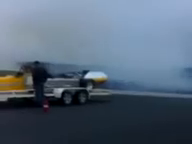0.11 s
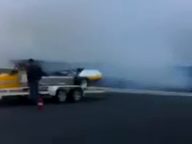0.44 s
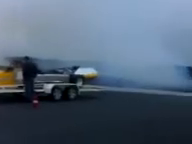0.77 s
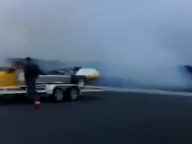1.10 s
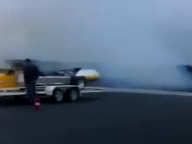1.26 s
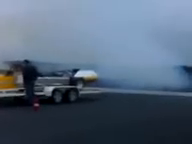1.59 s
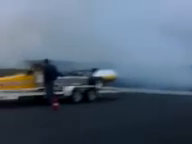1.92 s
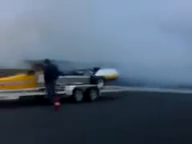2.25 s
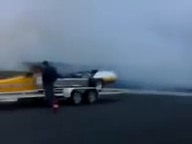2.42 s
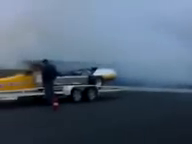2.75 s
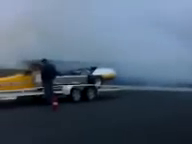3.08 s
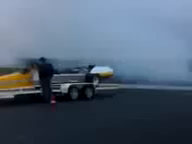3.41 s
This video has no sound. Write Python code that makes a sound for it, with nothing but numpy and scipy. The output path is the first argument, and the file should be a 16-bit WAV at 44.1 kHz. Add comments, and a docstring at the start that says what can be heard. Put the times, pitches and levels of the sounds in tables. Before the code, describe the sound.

A loud jet engine roars without a break in the open air, with a wavering howl, fluttering turbine tones and a faint low drone underneath. The microphone sounds muffled and overloads slightly, adding a light crackle.

```python
"""On an open airfield, a jet engine on a trailer runs at steady high power.
Turbulence in the exhaust makes a wide roar and rings in resonances as a hollow howl. A brighter rush
drifts in pitch, the turbine whines in a few thin tones, and a low drone sits underneath.
The small microphone passes little above 4 kHz and overloads on the highest crests, which crackle."""
import sys
import numpy as np
from scipy import signal
from scipy.fft import rfft, irfft
from scipy.io import wavfile
from scipy.ndimage import uniform_filter1d

SR = 44100
rng = np.random.default_rng(int(sys.argv[2]) if len(sys.argv) > 2 else 0)


def pcm_store(signal):
    """Save signal as 16-bit PCM."""
    levels = np.round(np.clip(np.atleast_2d(signal), -1, 1) * 32767)
    wavfile.write(sys.argv[1], SR, levels.astype(np.int16).T)


N = 155673
TIME = np.arange(N) / SR
FLUTTER_HZ = 13.4  # pace of the tones' flutter and the exhaust's buffeting

# Surges of the exhaust. Each row: time in seconds, howl gain in dB, gain of the roar's treble in dB.
EXHAUST_SURGES = [(0, 0, 2), (.2, -3.5, 3), (.35, 2.5, 0.5), (.7, -2, 0), (1.0, -0.5, -1), (1.5, 0.5, -0.5),
                  (1.85, -1.5, 0.5), (2.35, -0.5, 0.5), (2.5, -2.5, 2), (2.7, 2, 2), (3.0, 0, -1.5),
                  (3.25, 1.5, -0.5), (3.53, -1, -0.5)]


def roar(level_db=-16, patch_db=1.68, treble_ramp_hz=(1800, 2700)):
    """The exhaust mixes with the air: wide noise whose colour shifts in turbulent patches."""
    # Tone colour of the roar. Each row: frequency in Hz, relative level in dB.
    roar_spectrum = [(10, -49.5), (28, -29.5), (55, -23), (100, -8.5), (155, -9.5), (200, -9), (250, 3),
                     (300, 0), (385, -3.5), (440, 1), (520, -6), (610, 2), (880, 0), (980, 2.5), (1250, -6),
                     (1550, -4), (2300, -6.5), (2750, -5.5), (3100, -14), (3500, -22), (3900, -29),
                     (4250, -40), (4600, -55)]
    size, hop = 1024, 256
    frames = N // hop + 5
    hz = np.fft.rfftfreq(size, 1 / SR)
    frame_times = np.arange(frames) * hop / SR
    real, imag, patches = rng.standard_normal((3, frames, len(hz)))
    patches = uniform_filter1d(patches, size=14, axis=0)  # smear in time
    patches = unit(uniform_filter1d(patches, size=8, axis=1))  # and in frequency
    points_hz, points_db = np.transpose(roar_spectrum)
    colour_db = np.interp(np.log(hz + 1), np.log(points_hz), points_db)
    _, surge_db = curve(EXHAUST_SURGES, frame_times)
    treble_db = np.outer(surge_db, np.interp(hz, treble_ramp_hz, [0, 1]))
    spectra = (real + 1j * imag) * amp(colour_db + treble_db + patch_db * patches)
    _, noise = signal.istft(spectra.T, nperseg=size, noverlap=size - hop)
    return amp(level_db) * unit(noise[:N])


def howl():
    """The exhaust drives a cluster of close, hollow resonances that waver together."""
    # Resonances of the howl. Each row: centre in Hz, width in Hz, level in dB before surge and swell.
    howl_bands = [(671, 20.6, -25.5), (729.2, 68, -21.5), (786, 94, -21.5), (833.6, 54, -26.5)]
    surge_db, _ = curve(EXHAUST_SURGES, TIME)
    waver = .25 * drift(rate_hz=9)  # as a share of each width
    cluster = sum(amp(db) * resonance(hz + width * waver, width) for hz, width, db in howl_bands)
    return amp(surge_db) * cluster


def rush():
    """The bright rush of the jet: two bands of noise, each drifting in pitch and level."""
    # Path of the main band. Each row: time in seconds, centre in Hz, level in dB before the swell.
    main_band = [(0, 1833, -13.5), (.25, 1765, -14.5), (.55, 1803, -17.5), (.72, 1772, -15.5),
                 (.85, 2055, -20.5), (1.05, 1956, -21.5), (1.4, 1949, -18), (2.1, 1899, -19.5),
                 (2.6, 1863, -15.5), (3.1, 1876, -18.5), (3.53, 1860, -17.5)]
    # Path of a thinner, higher band, with the same columns.
    high_band = [(0, 2560, -30), (.25, 2500, -26), (.45, 2550, -34), (.68, 2480, -27), (.82, 2270, -24.5),
                 (1.05, 2230, -25), (1.6, 2260, -33), (2.1, 2250, -24), (2.5, 2280, -37.5),
                 (3.53, 2500, -37.5)]
    out = np.zeros(N)
    for path, width_hz in ((main_band, 330), (high_band, 215)):
        centre_hz, level_db = curve(path, TIME)
        out += amp(level_db) * resonance(centre_hz, width_hz)
    return out


def whine(wander_depth_hz=1.44, flutter_depth=.54):
    """The turbine's thin tones wander slightly in pitch and flutter in the hot air."""
    # Turbine tones. Each row: frequency in Hz, level in dB.
    turbine_tones = [(1395, -31.3), (1640.7, -25), (1887, -27), (2790, -34.2)]
    out = np.zeros(N)
    for hz, db in turbine_tones:
        pitch_hz = hz + wander_depth_hz * drift(rate_hz=6.16)
        phase = 2 * np.pi * np.cumsum(pitch_hz) / SR
        flutter = 1 + flutter_depth * drift(FLUTTER_HZ)
        out += amp(db) * unit(flutter * np.sin(phase))
    return out


def drone():
    """A narrow band of low noise hums under the roar."""
    return amp(-35.5) * resonance(centre_hz=174, width_hz=7)


def resonance(centre_hz, width_hz):
    """Turbulence ringing in a steep-sided resonance, whose centre may move."""
    offset_hz = np.fft.fftfreq(N, 1 / SR)
    real, imag = rng.standard_normal((2, N))
    envelope = np.fft.ifft((real + 1j * imag) / (1 + (offset_hz / width_hz) ** 2) ** 2)
    phase = 2 * np.pi * np.cumsum(centre_hz * np.ones(N)) / SR
    return unit((envelope * np.exp(1j * phase)).real)


def drift(rate_hz):
    """Smooth random motion up to about the given rate."""
    hz = np.fft.rfftfreq(N, 1 / SR)
    rolloff = np.exp(-.5 * (hz / rate_hz) ** 2)
    return unit(irfft(rfft(rng.standard_normal(N)) * rolloff, N))


def curve(table, t):
    """Each column of a timed table at the times t."""
    times, *columns = np.transpose(table)
    return [np.interp(t, times, column) for column in columns]


def amp(db):
    """Decibels to gain."""
    return 10 ** (np.asarray(db) / 20)


def unit(x):
    """Scales to rms 1."""
    return x / np.sqrt(np.mean(x ** 2) + 1e-20)


def limiter(x, threshold_db=-11.5, share=.23, reaction_s=.0035):
    """Quickly turns down a share of whatever rises above the threshold."""
    window = signal.windows.hann(2 * int(reaction_s * SR) + 1)
    power = signal.oaconvolve(x ** 2, window[None] / window.sum(), "same")
    over_db = np.maximum(10 * np.log10(abs(power) + 1e-12) - threshold_db, 0)
    return x * amp(-share * over_db)


def scene():
    """The exhaust layers swell and are lightly buffeted together; whine and drone are mixed in after."""
    # Swell of the exhaust at the microphone. Each row: time in seconds, gain in dB.
    exhaust_swell = [(0, -1.16), (.45, 0.36), (.95, 0.5), (1.5, 0.73), (1.85, 0), (2.25, 1.25), (2.5, -0.5),
                     (2.7, 0), (3.53, 1.8)]
    exhaust = roar() + howl() + rush()
    swell_db = curve(exhaust_swell, TIME)[0]
    buffet_db = .5 * drift(FLUTTER_HZ)
    return (exhaust * amp(swell_db + buffet_db) + whine() + drone())[None]


def record(dry, mic_top_hz=4400, clip_level=.71, crackle_top_hz=15900):
    """A dull microphone, a quick limiter, hard overload on the crests, then a cut of the highest treble."""
    mic_filter = signal.firwin(255, mic_top_hz, window=("kaiser", 8), fs=SR)
    top_filter = signal.firwin(511, crackle_top_hz, window=("kaiser", 9), fs=SR)
    dull = signal.oaconvolve(dry, mic_filter[None], "same")
    clipped = np.clip(limiter(dull), -clip_level, clip_level)
    return signal.oaconvolve(clipped, top_filter[None], "same")


dry = scene()
out = record(dry)
pcm_store(out)
```